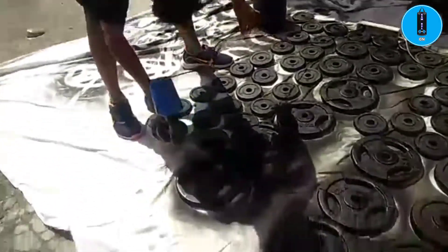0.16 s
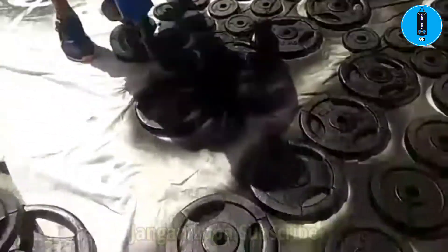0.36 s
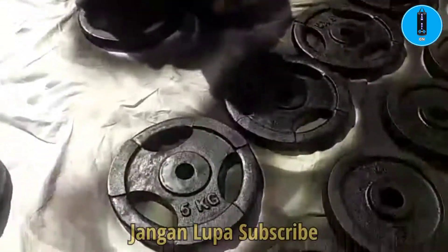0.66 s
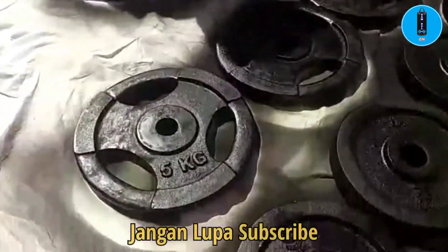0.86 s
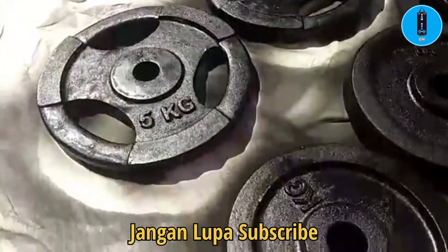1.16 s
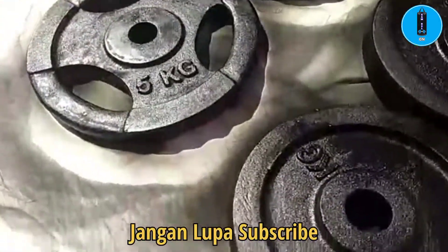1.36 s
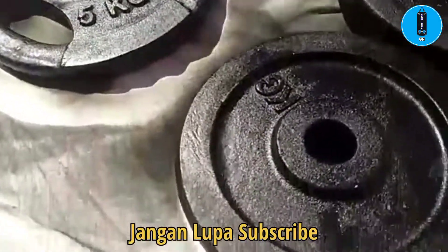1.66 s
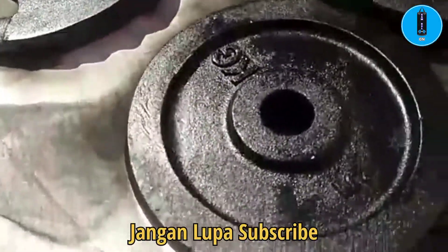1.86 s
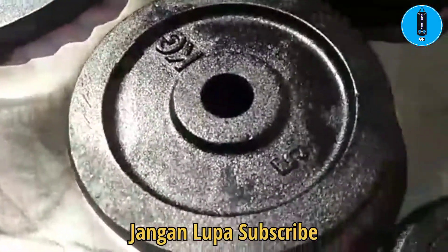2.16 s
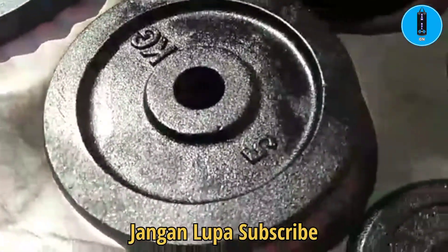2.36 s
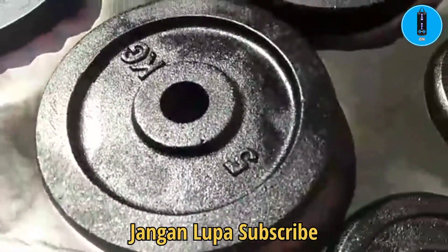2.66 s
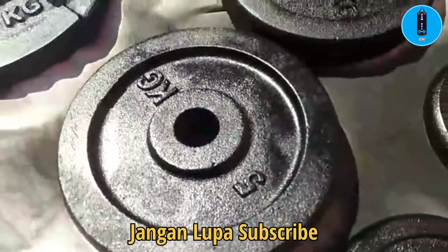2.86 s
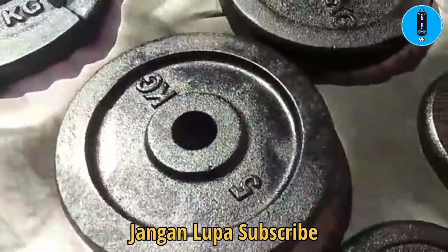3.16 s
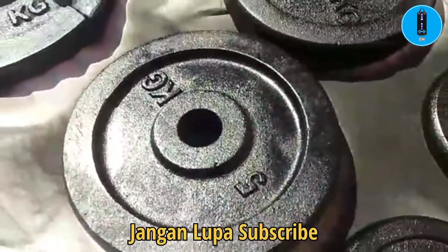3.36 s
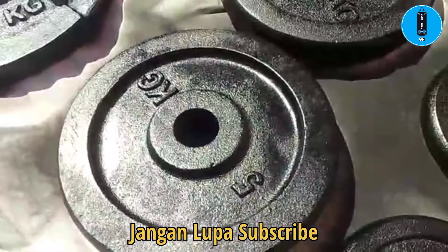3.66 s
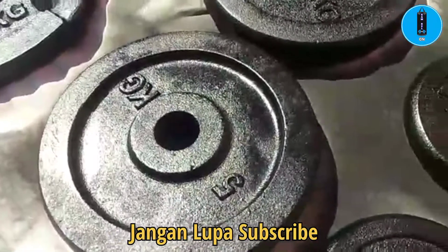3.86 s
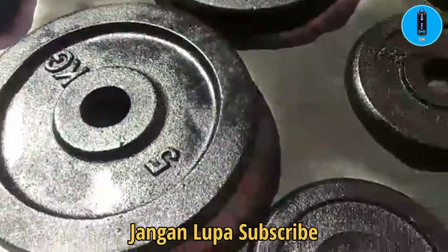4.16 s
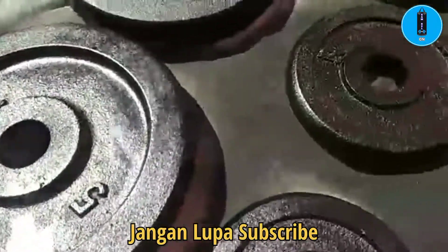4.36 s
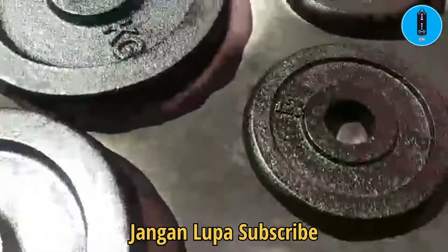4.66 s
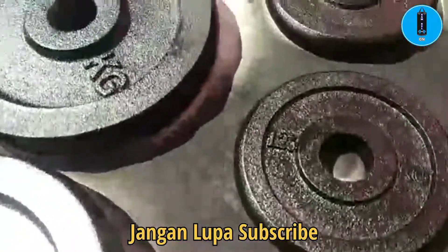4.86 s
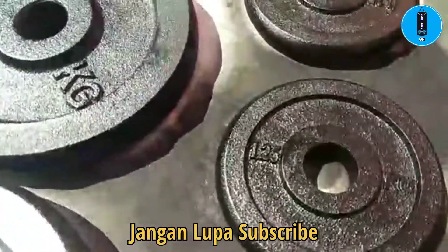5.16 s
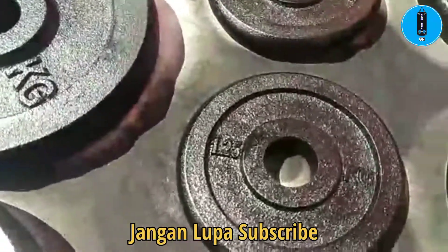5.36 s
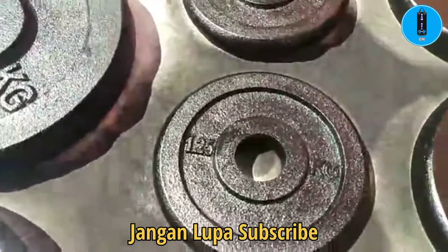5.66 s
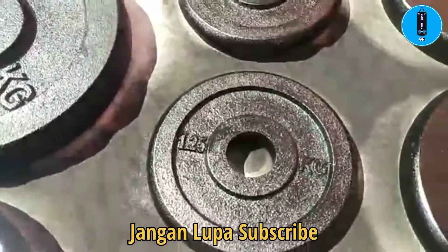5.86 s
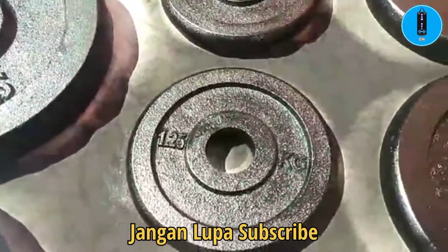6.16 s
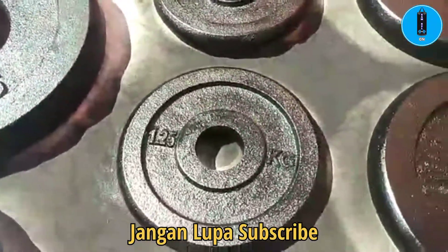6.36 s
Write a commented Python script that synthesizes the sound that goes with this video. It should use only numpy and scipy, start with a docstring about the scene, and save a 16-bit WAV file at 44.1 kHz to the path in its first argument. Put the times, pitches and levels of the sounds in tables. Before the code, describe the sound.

An electric paint sprayer whines and hisses steadily, then turns dull and lopsided to the right as a finger covers and bumps the left microphone.

```python
"""An electric paint spray gun runs steadily in a workshop, heard from a hand-held stereo microphone.
From the start the turbine hums and whines, air rushes, the nozzle hisses and the room rumbles; a rub opens it.
Brief air whistles follow from half a second on. After two seconds the microphone turns away from the gun,
and a finger covers the left port, muffling it, and knocks and rubs on the case until the end.
Sines make the turbine, whistles and knocks; filtered, flickering noise makes the air, rumble and rubs."""
import sys
import numpy as np
from scipy import signal
from scipy.fft import rfft, irfft, next_fast_len
from scipy.io import wavfile
from scipy.ndimage import uniform_filter1d, minimum_filter1d, map_coordinates

SR = 44100
rng = np.random.default_rng(int(sys.argv[2]) if len(sys.argv) > 2 else 0)


def waveform_to_disk(signal):
    """Save audio, clipped to [-1, 1], as 16-bit WAV at the path in sys.argv[1]."""
    frames = np.transpose(np.atleast_2d(signal))
    scaled = np.clip(frames, -1, 1) * 32767
    samples = np.round(scaled).astype(np.int16)
    wavfile.write(sys.argv[1], SR, samples)


N = 286631
TIME = np.arange(N) / SR  # seconds
SIZE = next_fast_len(N + 4096)  # samples of noise, with some to spare
FREQS = np.maximum(np.arange(SIZE // 2 + 1) * SR / SIZE, 1)  # Hz


def from_db(db):
    """Turn decibels into gain."""
    return 10 ** (np.asarray(db) / 20)


def rms_one(x):
    """Scale to unit power."""
    return x / np.sqrt(np.mean(x ** 2) + 1e-20)


def in_time(rows):
    """Join the rows by straight lines, giving one curve per column after the time."""
    seconds, *columns = np.transpose(rows)
    return [np.interp(TIME, seconds, column) for column in columns]


def level_gain(rows):
    """Turn a table of times and decibels into a gain curve."""
    return from_db(in_time(rows)[0])


def colour(points):
    """Read the gain at every frequency from a short spectrum."""
    hz, db = np.transpose(points)
    return from_db(np.interp(np.log(FREQS), np.log(hz), db))


def resonance(hz, width):
    """Gain of one resonance, 1 on top."""
    return 1 / np.sqrt(1 + ((FREQS ** 2 - hz ** 2) / (FREQS * width)) ** 2)


def hollows(modes):
    """Gain of several air resonances side by side."""
    return sum(from_db(db) * resonance(hz, width) ** 2 for hz, width, db in modes)


def drift(rate):
    """Smooth random wandering with spread 1; a higher rate in Hz wanders faster."""
    step = 40  # samples between the random points
    pole = np.exp(-2 * np.pi * rate * step / SR)
    noise = rng.standard_normal(N // step + 2002)
    slow = signal.lfilter([1], [1, -2 * pole, pole ** 2], noise)[2000:]
    return np.interp(np.arange(N) / step, np.arange(len(slow)), rms_one(slow))


def flicker(noise, patchy_db, rate, patch_hz):
    """Eddies and moving reflections lift and drop patches of the spectrum, each for a moment."""
    grid = signal.stft(noise, nperseg=512)[2]
    keep_time = np.exp(-2 * np.pi * rate * 256 / SR)
    keep_hz = np.exp(-SR / 512 / patch_hz)
    field = rng.standard_normal(grid.shape[1:])
    field = signal.lfilter([1], [1, -keep_time], field, axis=1)
    field = rms_one(signal.filtfilt([1], [1, -keep_hz], field, axis=0, padtype="even"))
    return signal.istft(grid * from_db(patchy_db * field))[1][:, :SIZE]


def turbulence(gain, alike, lag_s, patchy_db, rate, patch_hz=150):
    """Flickering stereo noise of one colour; the part shared by both ports reaches the left one later."""
    own, right = rfft(flicker(rng.standard_normal((2, SIZE)), patchy_db, rate, patch_hz))
    late = np.exp(-2j * np.pi * FREQS * lag_s)
    left = alike * right * late + np.sqrt(1 - alike ** 2) * own
    return rms_one(irfft(gain * np.array([left, right]), SIZE)[:, :N])


def gun_air(gain, patchy_db, rate, patch_hz=150):
    """Turbulence from the gun, which stands to the right and so reaches the left port later."""
    return turbulence(gain, 0.55, 0.00033, patchy_db, rate, patch_hz)


def lumpy(gain, lumps_db, rate):
    """Noise at one port that comes in uneven lumps."""
    noise = irfft(gain * rfft(rng.standard_normal(SIZE)), SIZE)[:N]
    return rms_one(noise * from_db(lumps_db * drift(rate)))


def swell(s, half, tail=1):
    """A bell-shaped rise and a fall that is tail times as long."""
    out = np.zeros(N)
    near = slice(*np.searchsorted(TIME, [s - 6 * half, s + 6 * half * tail]))
    away = TIME[near] - s
    out[near] = np.exp(-.5 * (away / np.where(away < 0, half, half * tail)) ** 2)
    return out


def ports(left_db, order=2):
    """Share a sound between left and right port, keeping its power (order 2) or its amplitude (order 1)."""
    pair = np.array([from_db(left_db), np.ones(N)])
    return pair / np.mean(pair ** order, axis=0) ** (1 / order)


def partial(turn, multiple, flutter_db, rate):
    """One line of the turbine; shifting reflections make its level and phase flutter."""
    level = from_db(flutter_db * drift(rate))
    phase_flutter = 0.42 * drift(rate=rate)  # radians
    return level * np.sin(multiple * turn + phase_flutter)


# Turbine speed, almost steady. Each row: time in seconds, speed in turns per second.
SPEED = [(0, 667.2), (.9, 665.7), (2.0, 665.8), (2.6, 666.6), (6.5, 666.5)]


def turbine_turn():
    """The turning angle in radians adds up the speed, which trembles slightly."""
    speed, = in_time(SPEED)
    jitter = 0.0003 * drift(32)  # as a share of the speed
    return 2 * np.pi * np.cumsum(speed * (1 + jitter)) / SR


# The hum as the microphone moves through its standing waves.
# Each row: time in seconds, relative level in dB.
HUM_LEVEL = [(0.0, -26.5), (0.16, -24.5), (0.36, -24.5), (0.45, -30.5), (0.9, -32), (0.96, -25),
             (1.03, -32), (1.08, -22), (1.27, -29.5), (1.47, -25), (1.55, -35.5), (1.59, -25.5),
             (2.08, -24), (2.21, -35.5), (2.565, -35.5), (2.6, -49), (2.64, -41.5), (2.71, -39),
             (2.78, -40.5), (2.86, -37.5), (3.1, -36), (3.19, -42.5), (3.25, -46), (3.29, -37.5),
             (3.46, -41), (3.96, -35), (4.02, -38), (4.87, -35.5), (5.25, -36), (6.24, -34.5), (6.5, -38.5)]
# Weak overtones of the hum. Each row: multiple of the turbine speed, level in dB relative to the rush.
ROTOR_ORDERS = [(2, -19), (3, -23.5), (4, -30)]


def rotor(turn, cover_db, hum_db=3, overtones_db=8):
    """The rotor hums once a turn, with weak overtones that follow the level of the rushing air."""
    leak_phase = 0.053 * cover_db - .35  # radians; sound that leaks round the finger arrives late
    waver = 0.14 * drift(15)  # radians, from reflections
    hum = np.sin([turn + waver + leak_phase, turn + waver])
    hum = hum * from_db(hum_db + 0.91 * drift(23.5)) * level_gain(HUM_LEVEL)
    overtones = sum(from_db(overtones_db + db) * partial(turn, multiple, flutter_db=3.0, rate=9.8)
                    for multiple, db in ROTOR_ORDERS)
    overtones = level_gain(RUSH_LEVEL) * overtones
    return ports(0.9 * cover_db + 1.0, order=1) * hum + ports(cover_db + 8.0) * overtones


# The blade whine over time. Each row: time in seconds, relative level in dB.
WHINE_LEVEL = [(0.0, -36.5), (0.2, -55), (0.25, -35), (0.29, -43), (0.38, -33), (0.57, -45.5), (0.66, -35),
               (0.74, -40), (0.87, -31.5), (0.98, -38), (1.12, -25.5), (1.3, -27.5), (1.55, -36),
               (1.78, -42), (1.86, -34), (2.01, -31.5), (2.2, -45.5), (2.85, -46.5), (2.97, -40),
               (3.31, -54), (3.38, -44.5), (3.44, -40), (3.48, -48), (3.507, -35), (3.53, -47),
               (3.605, -39), (3.8, -37), (3.97, -51.5), (4.17, -47), (4.25, -59), (4.46, -43), (4.61, -45),
               (4.69, -72), (4.87, -48), (4.99, -56), (5.14, -55), (5.3, -41.5), (5.44, -56), (5.52, -45),
               (5.65, -51), (5.87, -56), (6.01, -45), (6.08, -51), (6.33, -44.5), (6.41, -53), (6.5, -39)]
# The whine and its neighbours. Each row: multiple of the turbine speed, relative level in dB.
BLADE_ORDERS = [(6, -19), (7, -0.5), (21, -4)]
# Wake noise on both sides of the blade tone. Each row: centre in Hz, width in Hz, relative level in dB.
WAKE = [(4595, 110, 4), (4705, 130, 2)]


def blade_whine(turn, cover_db, whine_db=2, wake_db=-5.5):
    """The blades whine mainly seven times a turn, in a halo of blade wake noise."""
    blades = sum(from_db(db) * partial(turn, multiple, flutter_db=4.0, rate=40)
                 for multiple, db in BLADE_ORDERS)
    wake = from_db(wake_db) * gun_air(hollows(WAKE), patchy_db=2.5, rate=26)
    level = from_db(whine_db) * level_gain(WHINE_LEVEL)
    return ports(cover_db - 7, order=1) * level * (blades + wake)


# The rough upper octave of the blade whine. Each row: time in seconds, relative level in dB.
OCTAVE_LEVEL = [(0, -48), (2, -46), (2.4, -55), (2.75, -50), (3.5, -53), (4.9, -58), (5.25, -40),
                (5.45, -71), (5.8, -46), (5.94, -50), (6.1, -41.5), (6.5, -49)]


def blade_octave(turn, cover_db, line_db=-14):
    """An octave above the whine, a band of noise near 9320 Hz hides a weak line at 14 times a turn."""
    rough = gun_air(resonance(9320, width=300) ** 2, patchy_db=2.5, rate=12)
    line = from_db(line_db) * partial(turn, multiple=14, flutter_db=3.0, rate=40)
    return ports(cover_db) * level_gain(OCTAVE_LEVEL) * (rough + line)


def turbine(cover_db):
    """Rotor and blades turn together, so all their tones follow the same turning angle."""
    turn = turbine_turn()
    return rotor(turn, cover_db) + blade_whine(turn, cover_db) + blade_octave(turn, cover_db)


def bounce(x, delay_s=0.0021, sway_s=0.00025, copy_db=-10):
    """The floor sends back a copy whose delay sways with the hand, so that the colour keeps shifting."""
    late = (TIME - delay_s - sway_s * drift(0.507)) * SR
    copy = np.array([map_coordinates(side, [late], order=3) for side in x])
    return (x + from_db(copy_db) * copy) / np.hypot(1, from_db(copy_db))


# Colour of the rushing air. Each row: frequency in Hz, relative level in dB per Hz.
RUSH = [(150, -25), (230, -4), (300, -20), (360, -15), (420, -3.5), (600, -6), (745, 0.5), (790, -11),
        (840, -17), (890, -3.5), (1450, -4), (1850, -0.5), (2150, -3.5), (3000, -4), (4150, 1),
        (5000, -7.5), (6200, -13), (7000, -10.5), (7700, -43)]
# The rush, which falls as the microphone turns away. Each row: time in seconds, relative level in dB.
RUSH_LEVEL = [(0, -36.5), (.25, -40.5), (.55, -37.5), (1.3, -38), (1.7, -35.5), (2.04, -35), (2.19, -47),
              (4.3, -46.5), (6.5, -47.5)]
# Resonances of the motor shell. Each row: centre in Hz, width in Hz, relative level in dB.
SHELL = [(1097, 400, 13), (1940, 1230, 10)]
# The shell, heard while the microphone faces the gun. Each row: time in seconds, relative level in dB.
SHELL_LEVEL = [(0, -40), (.4, -36.5), (.85, -29.5), (1.4, -35.5), (2.05, -50), (2.3, -64), (6.5, -75)]
# Higher air resonances, of the vents. Each row: centre in Hz, width in Hz, relative level in dB.
VENTS = [(3220, 310, 2), (3700, 330, -7), (4260, 800, 6)]
# The vents over time. Each row: time in seconds, relative level in dB.
VENTS_LEVEL = [(0, -34), (.55, -35.5), (1.4, -29), (2.05, -35.5), (2.2, -66), (2.9, -45), (4.1, -42),
               (4.5, -43), (5.2, -44), (5.7, -46), (6.5, -41.5)]
# Colour of the broad hiss round the nozzle cap. Each row: frequency in Hz, relative level in dB per Hz.
CAP = [(4500, -19), (5000, 2.5), (5400, 4), (6100, 0.5), (6800, -6), (7600, -34)]
# The cap hiss over time. Each row: time in seconds, relative level in dB.
CAP_LEVEL = [(0, -46), (.22, -46), (.36, -32.5), (.7, -34.5), (1.25, -37.5), (1.5, -32), (2.09, -33.5),
             (2.22, -43), (3.6, -43.5), (4.1, -44.5), (4.65, -50), (5.15, -44), (5.75, -49), (6.2, -44),
             (6.5, -47)]
# Main air resonance of the housing. Each row: centre in Hz, width in Hz, relative level in dB.
HOUSING = [(2780, 400, 14.5)]
# The ringing housing over time. Each row: time in seconds, relative level in dB.
HOUSING_LEVEL = [(0.0, -34), (0.96, -33), (1.23, -37.5), (2.061, -37.5), (2.13, -44.5), (2.7, -40.5),
                 (4.18, -41), (4.36, -46), (6.5, -51.5)]


def air(cover_db, rush_db=8, ring_db=2.0):
    """Air rushes through the gun, hisses round the cap and rings in the shell, the housing and the vents."""
    rush = gun_air(colour(RUSH), patchy_db=3.0, rate=4.0, patch_hz=105)
    rush = from_db(rush_db) * level_gain(RUSH_LEVEL) * rush
    shell = level_gain(SHELL_LEVEL) * gun_air(hollows(SHELL), patchy_db=3.0, rate=17.0, patch_hz=99)
    vents = level_gain(VENTS_LEVEL) * gun_air(hollows(VENTS), patchy_db=2.5, rate=1.9, patch_hz=99)
    cap = level_gain(CAP_LEVEL) * gun_air(colour(CAP), patchy_db=3.5, rate=6.9, patch_hz=70)
    ring = gun_air(hollows(HOUSING), patchy_db=2.0, rate=13.0, patch_hz=99)
    ring = from_db(ring_db) * level_gain(HOUSING_LEVEL) * ring
    bounced = bounce(rush + shell + vents + cap)
    return ports(0.86 * cover_db - .5) * bounced + ports(1.1 * cover_db - 11.5) * ring


# The narrow beam sweeping over the ports.
# Each row: time in seconds, relative level in dB, left minus right in dB.
JET = [(0.0, -30, 6.5), (0.35, -26, 1), (0.5, -19.5, 7), (0.63, -22.5, 1), (0.94, -20, -0.5),
       (1.38, -20, 4), (2.01, -17.5, 4.5), (2.19, -34, -13.5), (2.75, -36, -28), (4.54, -35.5, -33),
       (4.94, -36.5, -21), (5.38, -37.5, -27), (5.87, -39.5, -22.5), (6.5, -35.5, -24)]
# How far the beam points away.
# Each row: time in seconds, broad hiss against the beamed top in dB, at the right port.
OFF_AXIS = [(0, -6.5), (2, -11.5), (2.8, -4), (4.4, -5.5), (6.1, 0), (6.5, -0.5)]
# Colour of the broad hiss. Each row: frequency in Hz, relative level in dB per Hz.
HISS = [(6500, -11.5), (7700, -14), (8500, -12), (9200, -8.5), (10000, -3), (11800, 1.5), (13000, -0.5),
        (15400, 6.5), (16500, -39)]
# Colour of the beamed, very high top. Each row: frequency in Hz, relative level in dB per Hz.
HISS_TOP = [(10000, -22), (11500, -3.5), (13000, 7.5), (14000, 9.5), (15400, 8.5), (16500, -31)]
# The nozzle spits. Each row: time in seconds, rise in dB.
SPITS = [(.185, 1), (.53, 1), (1.245, 0.5), (1.68, 2), (2.218, 2)]


def nozzle(cover_db, hiss_db=4.0):
    """The jet tears paint into mist with a very high hiss, dull off axis; its sputter calms under the finger."""
    level_db, pan_db = in_time(JET)
    away_db, = in_time(OFF_AXIS)
    dull = from_db([2.23 * away_db + 8.5, away_db])  # share of broad hiss at the left and right port
    broad = turbulence(colour(HISS), alike=0.53, lag_s=0, patchy_db=5.196, rate=9.7, patch_hz=132)
    top = turbulence(colour(HISS_TOP), alike=0.63, lag_s=0, patchy_db=1.2, rate=8.6, patch_hz=136)
    hiss = (top + dull * broad) / np.hypot(1, dull)
    sputter_db = 1.35 * from_db(0.3 * cover_db) * drift(20)
    spit_db = sum(db * swell(s, half=0.012) for s, db in SPITS)
    flutter_db = 0.8 * drift(75)
    loudness = from_db(hiss_db + level_db + sputter_db + spit_db + flutter_db)
    return ports(pan_db, order=1) * loudness * hiss


# Colour of the workshop's low rumble. Each row: frequency in Hz, relative level in dB per Hz.
RUMBLE = [(25, -38), (45, -34), (70, -2.5), (108, 6.5), (130, 2.5), (185, 2.5), (250, -2), (330, -9.5),
          (600, -23)]
# The rumble over time. Each row: time in seconds, relative level in dB.
RUMBLE_LEVEL = [(0, -37.5), (.25, -49), (.6, -40), (1.35, -37.5), (1.87, -44), (2.05, -38.5), (2.3, -48),
                (3.5, -48.5), (4.4, -49), (6.5, -49.5)]


def workshop(cover_db):
    """A low rumble, nearly alike at both ports until the finger weakens it at the left one."""
    level_db, = in_time(RUMBLE_LEVEL)
    rumble = turbulence(colour(RUMBLE), alike=0.96, lag_s=0, patchy_db=1.3, rate=9.0, patch_hz=60)
    return from_db([level_db + 1.3 * cover_db, level_db]) * rumble


# Finger rubs. Each row: time in seconds, half length in seconds,
# then the relative levels of boom, scuff and crackle in dB.
RUBS = [(0.03, 0.026, -54, -33.5, -60), (2.118, 0.044, -27.5, -38.5, -52), (2.29, .02, -42, -47, -60),
        (2.433, 0.031, -43, -41, -55), (2.53, .015, -45, -61, -60), (2.621, .012, -36, -34.5, -37),
        (2.755, 0.0099, -42, -42, -60), (3.145, 0.014, -53, -44, -52), (3.872, 0.039, -50, -57, -60),
        (4.478, 0.017, -42, -47, -55), (4.567, 0.022, -43, -51, -58), (4.68, 0.017, -18, -26, -26.5),
        (4.754, .015, -45, -46, -58), (4.838, 0.011, -38, -51, -60), (5.395, 0.013, -40, -59, -60),
        (5.56, 0.011, -41, -58, -60), (5.738, .011, -51, -60, -60), (5.878, 0.019, -53, -51, -60),
        (5.958, 0.013, -46, -43, -58), (6.043, 0.027, -38.5, -41, -56)]
# Colour of the boom at the left port. Each row: frequency in Hz, relative level in dB per Hz.
RUB_BOOM = [(25, -25), (60, 1), (110, 12), (180, 6), (300, -4.5), (500, -35), (1000, -42), (6000, -65)]
# Colour of the scuff at both ports. Each row: frequency in Hz, relative level in dB per Hz.
RUB_SCUFF = [(110, 1), (230, 8), (380, 6), (560, -4), (700, -4), (1000, -8), (1400, -18), (3000, -35)]
# Colour of the crackle at the right, open port. Each row: frequency in Hz, relative level in dB per Hz.
RUB_CRACKLE = [(500, -1), (900, 1), (1250, -17), (1600, 8), (2250, -2), (2800, 2), (3600, -7), (5500, -22)]


def rubs(scuff_open_db=-5):
    """Skin drags over the case: a boom at the left port, a crackle at the right and a scuff at both."""
    boom, scuff, crackle = sum(from_db(levels_db)[:, None] * swell(s, half, tail=0.99)
                               for s, half, *levels_db in RUBS)
    boom = boom * lumpy(colour(RUB_BOOM), lumps_db=1.5, rate=330)
    scuff = scuff * lumpy(colour(RUB_SCUFF), lumps_db=3.5, rate=380)
    crackle = crackle * lumpy(colour(RUB_CRACKLE), lumps_db=5, rate=210)
    return np.array([boom + scuff, crackle + from_db(scuff_open_db) * scuff])


# Short whistles of air at an edge of the housing.
# Each row: time in seconds, half length in seconds, pitch in Hz, relative level in dB.
WHISTLES = [(0.533, 0.079, 4200, -33), (2.813, .006, 4400, -32), (2.852, 0.011, 4190, -32),
            (2.863, 0.0076, 4350, -31), (2.892, 0.0076, 4140, -30), (2.95, .015, 4300, -39),
            (2.976, .009, 4330, -35), (3.39, 0.0073, 4180, -34), (3.42, .008, 4300, -40),
            (3.455, .007, 4400, -39), (3.478, 0.005, 4240, -36), (3.513, 0.0064, 4280, -33),
            (4.5, 0.1, 4150, -43), (6.21, .01, 4230, -38)]


def whistles(cover_db, wobble_hz=25):
    """Now and then the air catches an edge and squeaks at an unsteady pitch."""
    wobble = 2 * np.pi * np.cumsum(wobble_hz * drift(36.7)) / SR
    squeaks = sum(from_db(db) * swell(s, half) * np.sin(2 * np.pi * hz * TIME + wobble)
                  for s, half, hz, db in WHISTLES)
    return ports(cover_db - 29) * squeaks


# The finger lands on the left port, then seals it.
# Each row: start in seconds, time taken in seconds, loss in dB.
PRESSES = [(2.04, .17, 22.5), (2.38, 0.38, 8.5)]


def finger():
    """Cover of the left port in dB, zero when open: each press shuts it further."""
    return -sum(db * np.clip((TIME - s) / taken, 0, 1) for s, taken, db in PRESSES)


def tremor(cover_db, tremor_db=-57.5):
    """The pressed finger trembles as a deep, lumpy noise at the left port, more so round each knock."""
    unrest = 1 + np.max([swell(s, half=0.08) for s, *_ in KNOCKS], axis=0)
    pressed = 1 - from_db(cover_db)
    noise = lumpy(resonance(55, width=96) ** 2, lumps_db=3.5, rate=3.6)
    return from_db(tremor_db) * unrest * pressed ** 2 * noise * np.array([[1], [0]])


# Finger knocks on the case. Each row: time in seconds, level of the pumped air in dB, pitch in Hz,
# level of the snap against the pumped air in dB.
KNOCKS = [(2.161, -26, 111, -16), (2.308, -28, 111, -22), (2.371, -28, 104, -20), (2.459, -6, 100, -13),
          (2.612, -22, 105, -12), (2.624, -24, 85, -18), (2.667, -29, 110, -12), (2.755, -16, 126, -18),
          (2.855, -32, 109, -6), (2.912, -38, 90, -13), (2.974, -31, 128, -6), (3.05, -31, 115, -20),
          (3.141, -34, 140, -14), (3.158, -28, 165, -12), (3.203, -28, 127, -19), (3.315, -37, 85, -22),
          (3.847, -29, 175, -17), (4.672, -17, 135, -9), (4.683, -18, 140, -14), (4.698, -13, 106, -22),
          (4.825, -33, 110, -23), (4.848, -31, 110, -18), (4.931, -31, 86, -28), (4.972, -36, 95, -28),
          (5.382, -32, 83, -22), (5.411, -35, 80, -28), (5.553, -33, 100, -20), (5.572, -38, 100, -20),
          (5.865, -32, 75, -24), (5.899, -35, 85, -24), (6.058, -35, 130, -16), (6.079, -30, 90, -26),
          (6.112, -37, 85, -28), (6.259, -28, 77, -28), (6.355, -37, 75, -30)]


def knocks(rise=0.31, decay=0.79, relax=1.8, open_port_db=-24):
    """Each knock pumps air under the finger, ever slower as the skin relaxes, with a snap (times in cycles)."""
    out = np.zeros(N)
    for s, db, hz, snap_db in KNOCKS:
        near = np.abs(TIME - s) < .08
        cycles = (TIME[near] - s) * hz
        slowed = np.minimum(cycles, 0) + relax * np.log1p(np.maximum(cycles, 0) / relax)
        pump = np.cos(2 * np.pi * slowed) * np.exp(np.minimum(cycles / rise, -cycles / decay))
        # the case snaps at twice the pitch
        snap = np.cos(2 * np.pi * 2.0 * cycles) * np.exp(-np.abs(cycles) / 0.27)
        out[near] += from_db(db) * (pump + from_db(snap_db) * snap)
    return out * from_db([[0], [open_port_db]])


def scene():
    """Add up the gun, the workshop and the hand on the microphone."""
    cover_db = finger()
    gun = turbine(cover_db) + air(cover_db) + nozzle(cover_db) + whistles(cover_db)
    hand = rubs() + tremor(cover_db) + knocks()
    return gun + workshop(cover_db) + hand


def record(dry, low_cut_hz=33, top_cut_hz=15520):
    """The deepest bass is rolled off, a limiter holds the peaks, and the top is cut steeply."""
    thinned = signal.sosfilt(signal.butter(2, low_cut_hz, "high", fs=SR, output="sos"), dry)
    headroom = .88 / np.maximum(np.abs(thinned), .88)
    limiter_gain = uniform_filter1d(minimum_filter1d(headroom, size=201), size=101)
    top_cut = 1 / np.sqrt(1 + (FREQS / top_cut_hz) ** 1000)
    return irfft(rfft(thinned * limiter_gain, SIZE) * top_cut, SIZE)[:, :N]


dry = scene()
out = record(dry)
waveform_to_disk(out)
```